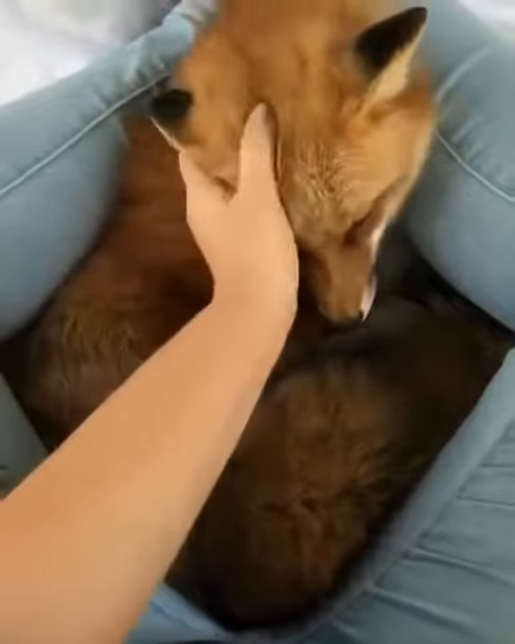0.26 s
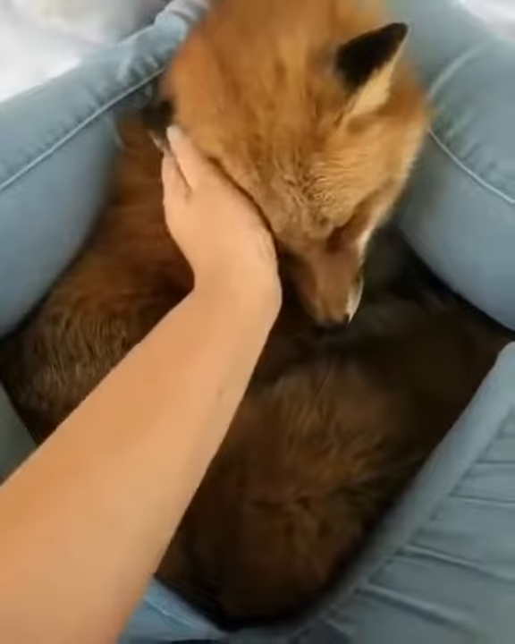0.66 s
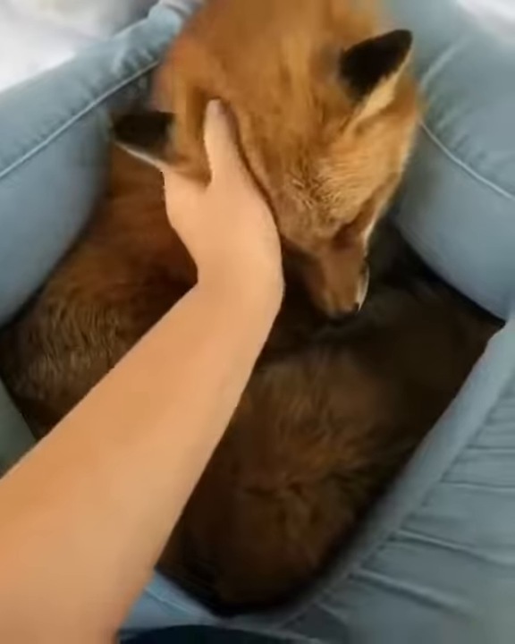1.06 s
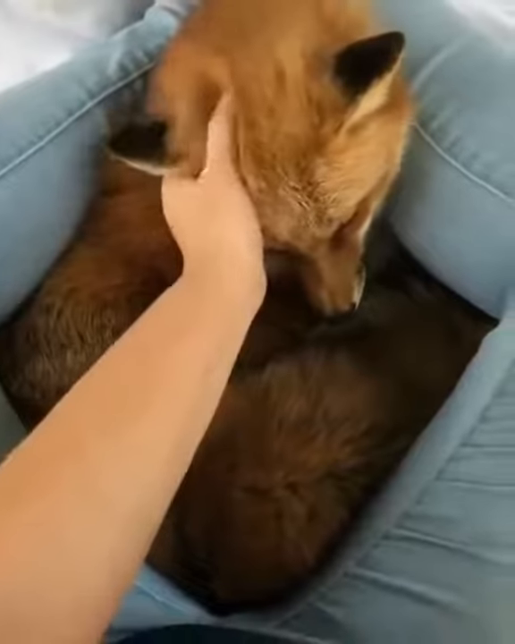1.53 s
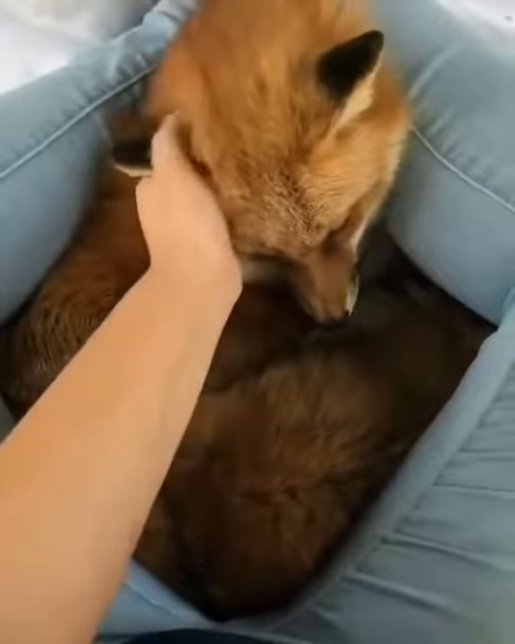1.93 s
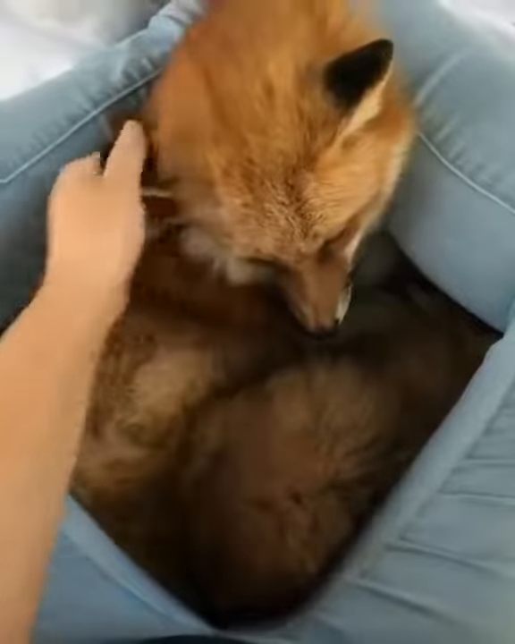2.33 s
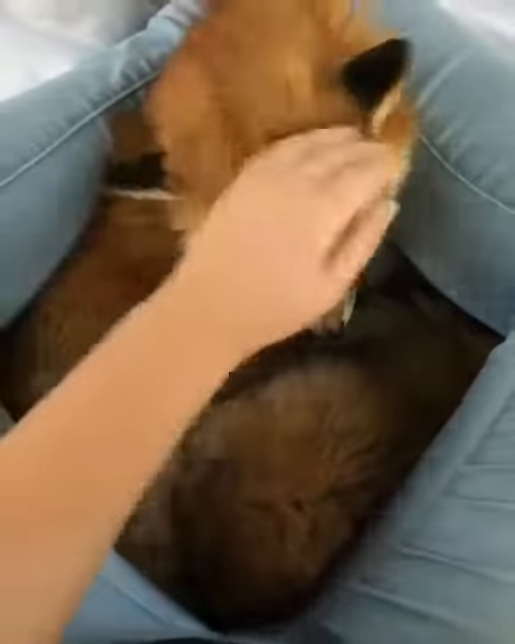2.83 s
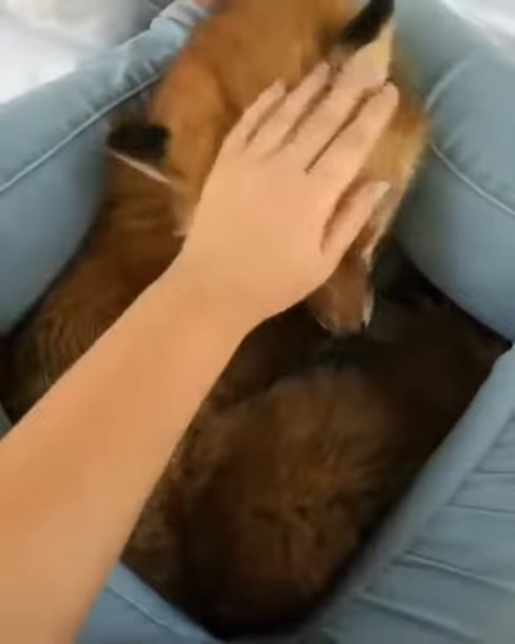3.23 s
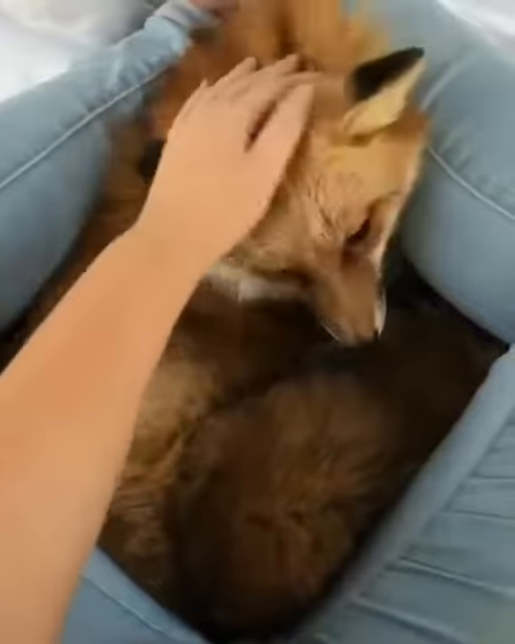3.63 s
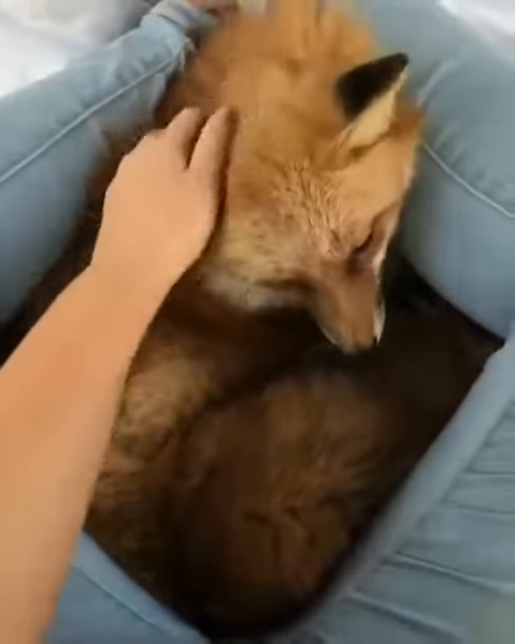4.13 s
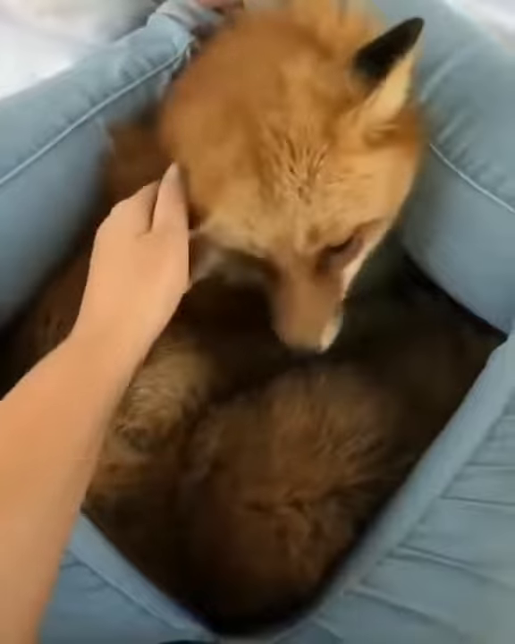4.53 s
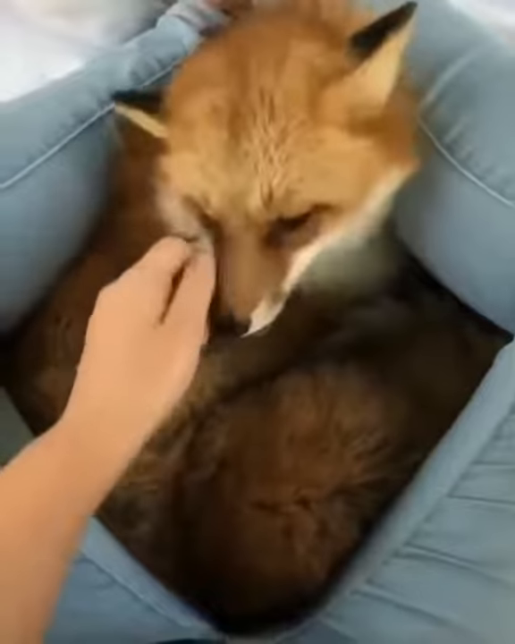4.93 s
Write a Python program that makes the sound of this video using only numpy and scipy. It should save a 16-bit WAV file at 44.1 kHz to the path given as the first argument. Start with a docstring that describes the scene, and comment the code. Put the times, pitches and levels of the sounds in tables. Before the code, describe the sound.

A fox whines close to the microphone in a quiet room with little echo. Faint birds chirp outside throughout, over a low hiss and rumble. The first soft nasal whine lasts half a second, jumping up in pitch and sliding down with a thin wheeze. After a few throaty clicks, three lower, creaky whines follow at about 0.9, 1.3 and 2.1 seconds. At 3 seconds a hand lands on the fox's head with a soft, dull pat, and a louder, hoarse, wavering whine runs until 3.6. Short rising grunts come at 3.9 and 4.4 seconds, each followed by wet lip smacks, tiny squeaks and another cracking whine, at 4.1 and 4.6. The sharpest smacks fall near 4.5 and 4.9 seconds, along with very faint brushing of fur. A last whine starts at 4.9 seconds, rising thin and high as it fades.

```python
"""In a quiet room, a fox whines close by while it is stroked on a soft seat.
Its mouth is nearly shut, so the pulses of its vocal folds hum through the nose, waver, and break
into creaks at a half or a third of the pitch. A hand pats and brushes its fur. Later the fox grunts
and its mouth opens with wet smacks, squeaks and hiss. Birds chirp faintly outside."""
import sys
import numpy as np
from scipy import signal
from scipy.fft import rfft, irfft
from scipy.io import wavfile
from scipy.ndimage import uniform_filter1d

SR = 44100
rng = np.random.default_rng(int(sys.argv[2]) if len(sys.argv) > 2 else 0)


def bounce(signal):
    """Save signal as a 16-bit WAV file at the path given by the first command-line argument."""
    frames = np.transpose(np.atleast_2d(signal))
    limited = np.clip(frames, -1, 1)
    pcm = np.round(limited * 32767).astype(np.int16)
    wavfile.write(sys.argv[1], SR, pcm)


N = 228310
TOP_HZ = 14100

# tone colours (f/Hz, level/dB)
ROOM_TONE = [(20, -26), (45, -13.5), (85, -2), (120, -0.5), (170, 2), (230, -5), (330, -11.5), (520, -17.5),
             (900, -15), (1400, -14), (2800, -19), (4500, -23), (7000, -25.5), (14000, -29)]  # background hiss and rumble
NOSE_TONE = [(20, -61), (70, -32), (110, -18.5), (150, -4.5), (195, -4.5), (250, -1.5), (370, 9.5),
             (450, 3), (520, -9), (600, -14.5), (690, -10), (780, -19.5), (870, -20.5), (1200, -48.5),
             (2500, -82)]  # hum through the nose
MOUTH_TONE = [(600, -14.5), (880, -3.5), (1060, -2.5), (1300, 4.5), (1500, -1.5), (1750, -0.5),
              (2200, -9.5), (2600, -9), (3000, -2), (3700, -22.5), (4800, -13), (7000, -17), (13000, -25)]  # thin sound leaking from the mouth
THROAT_TONE = [(20, -49), (70, -26), (120, -5.5), (170, 2), (250, -10), (600, -37), (2000, -70)]  # low throb of the throat
AIR_TONE = [(500, -47), (2000, 15.5), (3000, 14.5), (4200, 8), (6000, -13), (8000, 3), (11000, -1.5),
            (14000, -4)]  # hiss of breath
FUR_TONE = [(1000, -30), (4000, -6), (6000, -6), (8500, 0), (11000, 0), (14000, -1)]  # brushed fur
# how long the room echoes (f/Hz, time to fall 60 dB/s)
ECHO_TIMES = [(150, 0.16), (1000, 0.29), (4000, 0.93), (12000, 0.083)]

# pitch of the vocal folds, one curve a whine (t/s, f/Hz)
WHINE_PITCHES = [
    [(0.0, 377), (0.056, 392.1), (0.072, 538.6), (0.098, 540.3), (0.132, 460.6), (0.26, 407),
     (0.302, 373.7), (0.444, 335.8), (0.49, 353.4), (0.51, 416)],
    [(0.868, 250), (0.886, 246.3), (0.898, 249.4), (0.928, 251.6), (0.98, 279.6), (1.0, 312.5),
     (1.035, 266)],
    [(1.292, 355.7), (1.324, 235.4), (1.36, 246.5), (1.398, 274.6), (1.432, 253.3), (1.452, 254.1),
     (1.528, 265.7), (1.618, 258.3), (1.672, 260.2), (1.778, 251)],
    [(2.057, 361.0), (2.093, 280.8), (2.129, 245.2), (2.175, 271.7), (2.217, 236.4), (2.245, 236.4),
     (2.283, 254), (2.317, 237), (2.327, 215.7), (2.368, 267)],
    [(3.008, 365), (3.052, 394), (3.076, 368), (3.092, 335), (3.112, 325.6), (3.14, 356), (3.17, 360),
     (3.186, 437), (3.196, 451), (3.215, 430)],
    [(3.215, 421), (3.223, 404), (3.245, 472), (3.257, 387.4), (3.317, 383.7), (3.391, 468.2), (3.469, 401),
     (3.497, 434.8), (3.589, 392.8), (3.62, 295)],
    [(4.052, 509.5), (4.072, 419), (4.092, 343), (4.102, 302.6), (4.12, 256.8), (4.164, 246), (4.202, 278),
     (4.212, 285)],
    [(4.575, 240.8), (4.631, 226.8), (4.665, 289), (4.695, 346.8), (4.729, 418), (4.763, 423.4),
     (4.801, 406), (4.823, 328), (4.851, 447), (4.866, 443)],
    [(4.903, 342), (4.933, 335), (4.983, 289.5), (5.001, 348), (5.025, 528), (5.067, 544), (5.101, 492),
     (5.125, 482), (5.143, 532), (5.165, 630)],
]
# loudness of the hum, one curve a whine (t/s, level/dB)
HUM_LEVELS = [
    [(0.0, -48), (0.014, -48), (0.054, -46), (0.094, -57.5), (0.126, -50), (0.202, -45), (0.334, -46),
     (0.362, -42), (0.494, -41), (0.51, -46)],
    [(0.868, -42), (0.876, -45.5), (1.016, -46.5), (1.026, -44.5), (1.035, -77)],
    [(1.292, -60), (1.302, -46), (1.324, -51), (1.694, -50), (1.752, -46.5), (1.768, -48.5), (1.778, -82)],
    [(2.057, -48), (2.067, -45), (2.137, -52), (2.179, -47.5), (2.205, -53), (2.241, -47), (2.315, -50.5),
     (2.349, -44.5), (2.359, -51), (2.368, -49)],
    [(3.008, -38.5), (3.028, -33), (3.076, -31), (3.186, -35), (3.21, -44.5), (3.215, -57)],
    [(3.215, -34), (3.231, -35), (3.245, -37.5), (3.273, -32), (3.403, -38), (3.483, -34), (3.513, -37.5),
     (3.599, -33), (3.611, -42), (3.62, -73)],
    [(4.052, -56), (4.07, -31.5), (4.144, -34.5), (4.202, -41.5), (4.212, -58)],
    [(4.575, -30), (4.581, -33.5), (4.631, -31.5), (4.647, -36), (4.701, -37), (4.723, -46.5),
     (4.785, -30.5), (4.843, -33.5), (4.853, -32), (4.866, -55)],
    [(4.903, -44), (4.919, -31), (4.979, -33.5), (5.005, -38.5), (5.015, -50), (5.073, -48.5),
     (5.097, -43.5), (5.127, -43), (5.159, -64.5), (5.165, -54)],
]
# each whine's starting mix, against its hum (mouth/dB, wheeze/dB, air/dB)
WHINE_MIXES = [(-22, -35, -30), (-27.5, -23, -26), (-27.5, -31, -31), (-31.5, -35, -31.5),
               (-29.5, -32, -39), (-27, -33.5, -36.5), (-28.5, -37.5, -44), (-24.5, -37, -32.5),
               (-23.5, -38, -34.5)]
# the nose passes less of a high note, so the rest gains on the hum (f/Hz, gain/dB)
HIGH_NOTE_GAIN = [(250, -1.5), (410, -1), (460, 7), (545, 22)]
# where the voice breaks; doubling and tripling stress every second or third pulse
# (start/s, end/s, roughness/0-1, doubling/0-1, tripling/0-1)
VOICE_BREAKS = [(0, 0.064, 0.78, 0.6, 0.79), (0.227, 0.36, 0.6, 0.26, 1), (0.857, 0.986, 0.29, 1, 0.1),
                (1.378, 1.406, 0.65, 0.98, .02), (2.149, 2.286, 0.49, 0.99, 0),
                (2.997, 3.037, 0.82, 0.42, 0.4), (3.036, 3.18, 0.42, 0.1, 0.16), (3.247, 3.372, .47, 0, 0),
                (3.419, 3.623, 0.38, 0.02, 0.12), (3.889, 3.924, 0.48, 0.7, 0.17),
                (4.067, 4.12, .35, 0, 0.66), (4.124, 4.22, 0.23, 1, 0.4), (4.46, 4.495, 0.42, 0.98, 0),
                (4.565, 4.64, .5, 0.85, 0.32), (4.709, 4.746, 0.25, 0.34, 0.46),
                (4.903, 5.014, 0.27, 0.2, 0.66)]
# the clear voice between breaks (roughness/0-1, doubling/0-1, tripling/0-1)
CLEAR_VOICE = (0.049, 0.03, 0.01)
# the mouth opens and closes again (t/s, mouth gain/dB, air gain/dB)
MOUTH_GAPES = [(0.401, -3.5, 0.5), (3.038, 10.5, -4), (4.068, 11.5, 3), (4.578, 10, -4), (4.922, 10.5, -3)]
# the nostrils pinch and wheeze louder (t/s, half length/s, gain/dB)
NOSE_PINCHES = [(0.411, 0.042, 13.5), (3.027, 0.027, 10), (4.167, 0.012, 7), (4.816, 0.016, 17.5)]
# where the narrow nostrils ring (t/s, f/Hz)
NOSTRIL_RING = [(0, 5340), (3, 5460), (3.06, 5900), (3.16, 6050), (3.2, 4570), (3.24, 5930), (3.31, 6400),
                (3.38, 5930), (3.55, 5930), (4.15, 5560), (4.82, 6120), (5.05, 5120), (5.15, 5700)]

# a high bird repeats a tick and a falling buzz (t/s, delay of the buzz/s)
BIRD_SONGS = [ (0.159, 0.26), (1.33, 0.19), (2.452, 0.17), (3.622, 0.17)]
# its two notes; blur adds warble and echo (start f/Hz, end f/Hz, level/dB, blur/0-1)
TICK, BUZZ = (8102, 7847, -68.5, 1.5), (7191, 6206, -70.5, 2)
# another bird repeats one falling chirp (t/s, level/dB, blur/0-1)
BIRD_CHIRPS = [(.494, -68.5, 0.3), (.572, -67.5, 0.26), (.66, -74, 0.26), (.813, -68, 0.26),
               (1.005, -68.5, 0.67), (1.301, -69, 0.74), (1.715, -67, 0.95), (2.185, -65.5, 0.76),
               (2.458, -63.5, 0.6), (2.796, -65.5, .4)]
# that chirp (length/s, start f/Hz, end f/Hz)
CHIRP_SHAPE = (0.0319, 3650, 3080)
# plain whistles (t/s, length/s, start f/Hz, end f/Hz, level/dB, blur/0-1)
BIRD_WHISTLES = [(0.696, 0.046, 2850, 3960, -65, 0.3), (1.165, .03, 2650, 2553, -68, 0.52),
                 (1.392, 0.03, 3000, 2810, -68.5, 0.6), (1.809, 0.15, 3250, 2950, -74.5, 0.86),
                 (2.023, 0.2, 4120, 4100, -75, 0.45), (2.22, 0.057, 3260, 3270, -66, 0.08),
                 (2.905, 0.075, 4000, 4400, -71.5, .8), (3.595, 0.1586, 3470, 3485, -68, 0.27),
                 (3.922, 0.09, 2950, 2898, -69, 0.26)]

# lone snaps of the vocal folds (t/s, level/dB)
FOLD_SNAPS = [(0.785, -42.5), (0.817, -46), (.823, -43.5), (.84, -41), (.856, -43.5), (2.902, -46.5),
              (2.99, -48), (2.995, -44)]
# wet smacks of lips and tongue (t/s, level/dB)
LIP_SMACKS = [(3.013, -50), (3.037, -50), (4.026, -41.5), (4.5071, -36.5), (4.5433, -49), (4.548, -22.5),
              (4.552, -40), (4.568, -43), (4.8708, -36), (4.9, -24)]
# ring of the mouth after a smack (f/Hz, level/dB, time to fall 60 dB/s)
SMACK_RING = [(1360, -1, 0.018), (2470, -1, 0.031), (2700, 20.5, 0.0053), (3100, -25, 0.014),
              (5350, 6, 0.002), (8700, 8, 0.0023)]
# short rising grunts (t/s, length/s, level/dB)
FOX_GRUNTS = [(3.869, 0.0461, -35.5), (4.446, 0.042, -39.5)]
# squeaks as the mouth opens (t/s, length/s, level/dB, start f/Hz, roughness/0-1)
MOUTH_SQUEAKS = [(4.0275, 0.0079, -31.5, 503, 0), (4.037, 0.01, -38, 566, .1),
                 (4.046, 0.02, -43.5, 561, .5), (4.556, 0.011, -46, 478, 1.1),
                 (4.566, 0.0088, -40.5, 494, 0.83), (4.869, 0.013, -43.5, 526, 1.05),
                 (4.875, 0.0095, -41.5, 536, .1), (4.887, 0.0065, -46, 506, 0.5),
                 (4.894, 0.0095, -38.5, 572, 0.42), (4.901, .014, -46.5, 637, .15)]
# where the open mouth rings (f/Hz, width/Hz, level/dB)
OPEN_MOUTH_RING = [(570, 330, -0.5), (1156, 140, -1.5), (1560, 210, 1), (2120, 90, 9), (2460, 410, 1.5),
                   (3180, 540, -1.5), (4400, 1300, -17)]
# the hand brushes the cheek (t/s, length/s, level/dB)
FUR_STROKES = [(4.518, 0.18, -59.5), (4.853, .1, -60)]


def amp(db):
    """Turns decibels into a gain."""
    return 10 ** (np.asarray(db) / 20)


def unit(x):
    """Scales a sound to an average strength (rms) of 1."""
    return x / np.sqrt(np.mean(x ** 2) + 1e-20)


def steady(x, size=700):
    """Evens out the loudness but keeps the shape of each cycle."""
    power = uniform_filter1d(uniform_filter1d(x ** 2, size), size)
    return x / np.sqrt(abs(power) + 1e-14)


def read(points, hz):
    """Looks up a table by frequency, with octaves evenly spaced."""
    f, value = np.transpose(points)
    return np.interp(np.log(hz + 1), np.log(f + 1), value)


def add(mix, s, sound):
    """Mixes a sound in at s seconds."""
    part = mix[max(round(s * SR), 0):][:len(sound)]
    part += sound[:len(part)]


def colour(x, points, size=4096):
    """Gives a sound a tone colour; each pulse rings only after it strikes."""
    log_gain = np.log(amp(read(points, abs(np.fft.fftfreq(size, 1 / SR)))))
    response = np.fft.ifft(np.exp(np.conj(signal.hilbert(log_gain)))).real
    return signal.fftconvolve(x, response[:size // 2])[:len(x)]


def wander(n, hz):
    """A random drift that changes up to about hz times a second."""
    f = np.fft.rfftfreq(N, 1 / SR)
    return unit(irfft(rfft(rng.standard_normal(N)) / (1 + (f / hz) ** 4), N))[:n]


def fade(n, seconds):
    """A gain curve that softens both ends of a sound."""
    return signal.windows.tukey(n, min(2 * seconds * SR / n, 1))


def resonate(x, hz, width):
    """Makes a sound ring in a band that follows the curve hz."""
    turn, decay = np.exp(2j * np.pi * np.cumsum(hz) / SR), np.exp(-np.pi * width / SR)
    return 2 * (turn * signal.lfilter([1 - decay], [1, -decay], x / turn)).real


def pulses(turns, hz, soft_hz=9000):
    """One pulse at every whole turn, softened above soft_hz."""
    k = np.arange(1, 36)[:, None]
    overtones = np.cos(2 * np.pi * k * turns) * (k * hz < TOP_HZ) / (1 + (k * hz / soft_hz) ** 2)
    return overtones.sum(0) * np.sqrt(hz / TOP_HZ)


def echo(x, decay):
    """A smooth echo in which each band dies at its own speed."""
    hz, t, bands = signal.stft(rng.standard_normal(SR), SR, nperseg=256)
    tail = signal.istft(bands * amp(-60 * t / read(decay, hz)[:, None]), SR, nperseg=256)[1]
    return signal.fftconvolve(x, tail / np.linalg.norm(tail))[:N]


def room_tone(hiss_db=-65, swell_db=0.36, drone_hz=57, drone_db=-75):
    """Soft hiss and rumble, with a low wavering drone."""
    gains = amp(read(ROOM_TONE, np.fft.rfftfreq(N, 1 / SR)))
    hiss = unit(irfft(rfft(rng.standard_normal(N)) * gains, N))
    drone = np.sin(2 * np.pi * np.cumsum(drone_hz + 4 * wander(N, 10)) / SR)
    drone *= 1 + .4 * wander(N, 9)
    return amp(hiss_db + swell_db * wander(N, 14)) * hiss + amp(drone_db) * unit(drone)


def voice_breaks(t, change_s=0.0084):
    """Roughness, doubling and tripling as the voice breaks and recovers."""
    shares = np.outer(CLEAR_VOICE, np.ones(len(t)))
    for start, end, *depths in VOICE_BREAKS:
        inside = np.clip(np.minimum(t - start, end - t) / change_s + .5, 0, 1)
        shares += np.outer(np.subtract(depths, CLEAR_VOICE), inside)
    return np.clip(shares, 0, 1)


def vocal_folds(t, hz, flap_hz=105, closure=2.06):
    """The folds chop breath into round gusts, sharp beats and noisy puffs, unevenly when rough."""
    n = len(t)
    rough, doubled, tripled = voice_breaks(t)
    # hoarseness: slack tissue flaps beside the folds, until a creak locks it to them
    flap = np.sin(2 * np.pi * np.cumsum(flap_hz * (1 + .3 * wander(n, 40))) / SR)
    flutter = rough * (1 - np.maximum(doubled, tripled)) * flap
    jitter = 0.15 * rough * wander(n, 170)
    waver = (0.00724 + .07 * rough) * wander(n, 35)
    turns = np.cumsum(hz * (1 + 0.35 * flutter + jitter + waver)) / SR
    cycle = np.round(turns).astype(int)
    # in a creak only every second or third pulse keeps its strength
    strength = (1 - doubled * (cycle % 2 > 0)) * (1 - tripled * (cycle % 3 > 0))
    shimmer = 0.96 * rough * rng.uniform(-0.6, 1, N // 100)[cycle]
    strength *= np.exp(0.52 * flutter + shimmer)
    flow = strength * np.exp(closure * (np.cos(2 * np.pi * turns) - 1))
    beats = strength * pulses(turns, hz, soft_hz=3420)
    puffs = np.sqrt(strength) * (1.25 + np.exp(-(turns % 1) / 0.59)) * rng.standard_normal(n)
    return flow, beats, puffs, rough


def openings(t, open_s=0.016, close_s=0.048):
    """Gains in dB of mouth, wheeze and air, as the mouth gapes and the nostrils pinch."""
    mouth, wheeze, air = np.zeros((3, len(t)))
    for s, mouth_db, air_db in MOUTH_GAPES:
        gape = np.exp(-((t - s) / np.where(t < s, open_s, close_s)) ** 2)
        mouth += mouth_db * gape
        air += air_db * gape
    for s, half_length, db in NOSE_PINCHES:
        wheeze += db * np.exp(-((t - s) / half_length) ** 2)
    return mouth, wheeze, air


def nostrils(t, clear, rasp, clear_width_hz=650, rasp_width_hz=1400):
    """The narrow nostrils ring: a thin wheeze from clear pulses, a wider one from rasp."""
    hz = np.interp(t, *np.transpose(NOSTRIL_RING))
    return steady(sum(resonate(resonate(drive, hz, width), hz, width)
                      for drive, width in ((clear, clear_width_hz), (0.17 * rasp, rasp_width_hz))))


def whine(pitch, level, mix_db, throb_db=9, wheeze_db=-1, air_db=3):
    """Pulses hum through the nose and leak from the mouth. Gives the start time and the sound."""
    t = np.arange(level[0][0], level[-1][0], 1 / SR)
    hz = np.interp(t, *np.transpose(pitch))
    hum = amp(np.interp(t, *np.transpose(level)))
    strain_db = np.outer((1, 1, .6), uniform_filter1d(read(HIGH_NOTE_GAIN, hz), size=800))
    leak, squeeze, hiss = hum * amp(np.array(mix_db)[:, None] + strain_db + openings(t))
    flow, beats, puffs, rough = vocal_folds(t, hz)
    noisy = np.clip(0.025 + 1.03 * rough, 0, .95)
    clear, rasp = (1 - noisy) * beats, noisy * puffs  # roughness turns overtones to rasp
    nose = hum * steady(colour(flow + 0.73 * rough * puffs, NOSE_TONE))
    mouth = leak * steady(colour(clear + rasp, MOUTH_TONE))
    # an open mouth lets the slow beats of a creak out
    throb = amp(throb_db) * leak * colour(steady(flow), THROAT_TONE)
    wheeze = amp(wheeze_db) * squeeze * nostrils(t, clear, rasp)
    breath = puffs + rng.standard_normal(len(t))  # some air flows between the puffs
    air = amp(air_db) * hiss * steady(colour(breath, AIR_TONE))
    return t[0], (nose + mouth + throb + wheeze + air) * fade(len(t), 0.0035)


def birds(tick_s=.026, buzz_s=.095, warble=0.0515, echo_db=-2):
    """Gliding whistles; the blurred ones buzz and arrive mostly as echo."""
    notes = []
    for s, delay in BIRD_SONGS:
        notes += [(s, tick_s, *TICK), (s + delay, buzz_s, *BUZZ)]
    notes += [(s, *CHIRP_SHAPE, db, blur) for s, db, blur in BIRD_CHIRPS]
    direct, scattered = np.zeros((2, N))
    for s, length, start_hz, end_hz, db, blur in notes + BIRD_WHISTLES:
        n, blur = int(length * SR), np.clip(blur, 0, 1)
        hz = np.geomspace(start_hz, end_hz, n) * (1 + warble * blur * wander(n, 267))
        note = amp(db) * unit(np.sin(2 * np.pi * np.cumsum(hz) / SR) * fade(n, 0.0033))
        add(direct, s, np.sqrt(1 - .8 * blur) * note)
        add(scattered, s, np.sqrt(blur) * note)
    return direct + amp(echo_db) * echo(scattered, decay=[(3000, 0.6), (8000, 0.18)])


def creaks():
    """Single snaps of the vocal folds ring the nose."""
    out, ring = np.zeros(N), colour(signal.unit_impulse(2048), NOSE_TONE)
    for s, db in FOLD_SNAPS:
        add(out, s, amp(db) * ring / abs(ring).max())
    return out


def pat(start_s=3.005, hz=165, db=-40, rise_s=0.0049):
    """The hand lands on the furry head with a dull, soft bump."""
    out, t = np.zeros(N), np.arange(SR // 10) / SR
    swell = t / rise_s * np.exp(1 - t / rise_s)
    add(out, start_s, amp(db) * swell * np.sin(2 * np.pi * hz * t))
    return out


def smacks(rise_s=0.00005):
    """A wet film parts and rings the mouth briefly."""
    out, t = np.zeros(N), np.arange(SR // 20) / SR
    ring = sum(amp(db - 60 * t / ring_s) * np.sin(2 * np.pi * hz * t) for hz, db, ring_s in SMACK_RING)
    ring *= 1 - np.exp(-t / rise_s)
    for s, db in LIP_SMACKS:
        add(out, s, amp(db) * ring / abs(ring).max())
    return out


def grunts(start_hz=234.7, end_hz=369, ends_db=-13.5):
    """Very short whines that swell and fade while the pitch rises."""
    out = np.zeros(N)
    for s, length, db in FOX_GRUNTS:
        pitch = [(s, start_hz), (s + length, end_hz)]
        level = [(s, db + ends_db), (s + length / 2, db), (s + length, db + ends_db)]
        add(out, *whine(pitch, level, mix_db=(-46, -35.5, -40)))
    return out


def squeaks(arch=0.069, fade_db=-6, hiss_db=-24):
    """A few hard, high pulses ring the open mouth, arching in pitch as they fade, with a little hiss."""
    out = np.zeros(N)
    for s, length, db, start_hz, rough in MOUTH_SQUEAKS:
        n, rough = int(length * SR), np.clip(rough, 0, 1)
        age = np.linspace(0, 1, n)
        hz = start_hz * (1 + arch * np.sin(np.pi * age ** 1.44))
        beats = unit(pulses(np.cumsum(hz) / SR - .5, hz))
        drive = (1 - rough) * beats + rough * rng.standard_normal(n)
        drive = np.pad(drive * amp(fade_db * age) * fade(n, 0.0012), (0, SR // 50))
        ring = sum((-1) ** k * amp(level) * resonate(drive, np.full(len(drive), f), width)
                   for k, (f, width, level) in enumerate(OPEN_MOUTH_RING))
        add(out, s, amp(db) * ring / ring[:n].std())
        add(out, s, amp(db + hiss_db) * rng.standard_normal(n) * fade(n, 0.00074))
    return out


def brushes(grain_db=3):
    """Hairs slip under the fingers: a fine, grainy hiss that swells and fades."""
    out = np.zeros(N)
    for s, length, db in FUR_STROKES:
        n = int(length * SR)
        hairs = rng.standard_normal(n) * amp(grain_db * wander(n, 400))
        add(out, s, amp(db) * unit(colour(hairs, FUR_TONE)) * np.sin(np.linspace(0, np.pi, n)))
    return out


def scene(echo_db=-29):
    """The fox is near, with little echo; the birds are far."""
    fox = creaks() + grunts() + squeaks() + smacks() + pat() + brushes()
    for pitch, level, mix_db in zip(WHINE_PITCHES, HUM_LEVELS, WHINE_MIXES):
        add(fox, *whine(pitch, level, mix_db))
    return (fox + amp(echo_db) * echo(fox, ECHO_TIMES) + birds() + room_tone())[None]


def record(dry):
    """Cuts the treble above TOP_HZ."""
    low_pass = signal.firwin(511, TOP_HZ, window=("kaiser", 9), fs=SR)
    return signal.oaconvolve(dry, low_pass[None], "same")


dry = scene()
out = record(dry)
bounce(out)
```